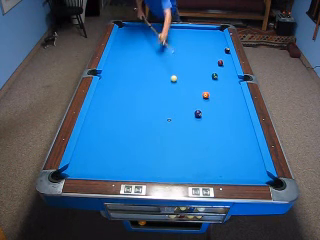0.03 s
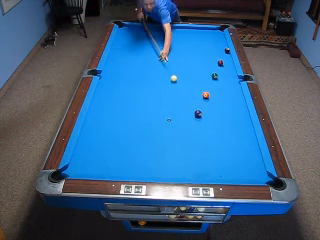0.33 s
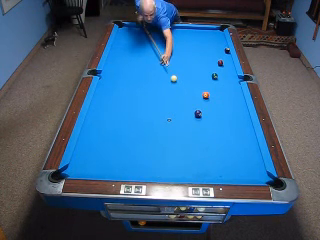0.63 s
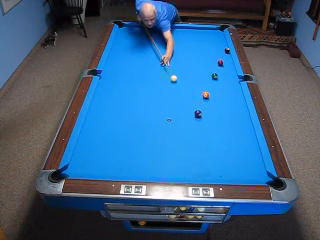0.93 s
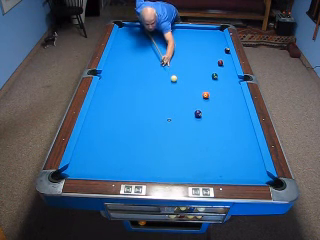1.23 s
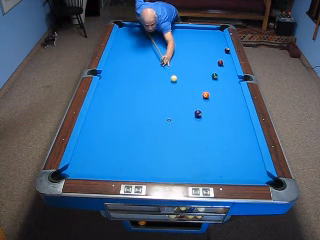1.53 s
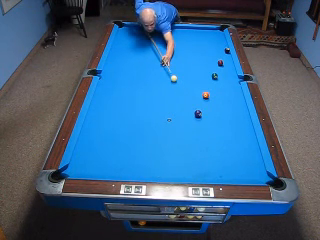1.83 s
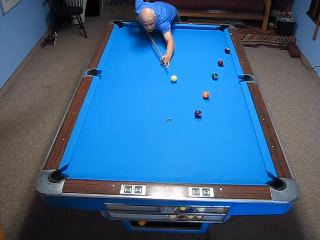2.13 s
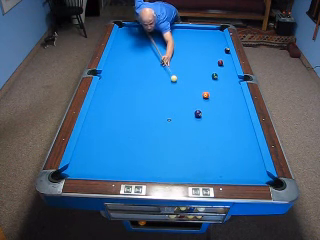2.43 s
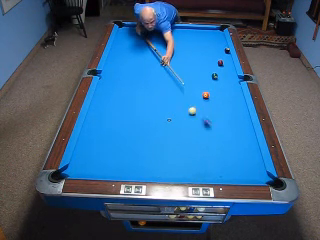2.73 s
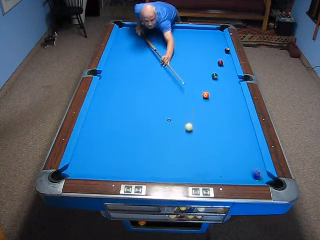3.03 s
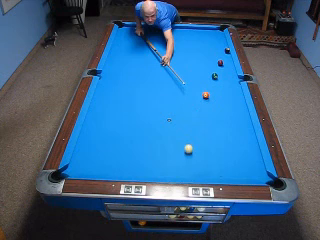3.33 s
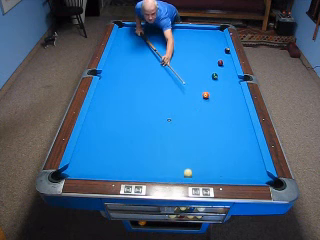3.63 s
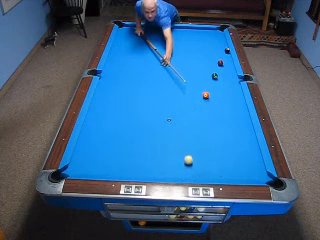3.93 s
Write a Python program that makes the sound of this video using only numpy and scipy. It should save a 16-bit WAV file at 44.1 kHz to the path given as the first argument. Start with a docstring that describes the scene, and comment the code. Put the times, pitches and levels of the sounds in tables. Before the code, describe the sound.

A pool shot sounds in a quiet room with humming ventilation. A hand slides faintly on cloth early on, with two light cue taps around 0.4 seconds. The cue knocks the ball at 2.6 seconds, and two balls clack loudly at 2.8. From 3.3 seconds one rattles into a pocket and rolls hollowly down the return channel, thudding several times from 3.7 to 4 seconds.

```python
"""Two pool balls clack in a quiet room with humming ventilation.
A hand slides on the cloth, the cue taps lightly, then knocks the cue ball into another; that ball
rattles into a corner pocket, rolls down the return channel and thuds at its bend. Each impact is a
short pulse that excites damped modes and reflections in the table and the room.
The clack drives a limiter, whose gain drops and then creeps back."""
import sys
import numpy as np
from scipy import signal
from scipy.fft import rfft, irfft
from scipy.io import wavfile

SR = 44100
rng = np.random.default_rng(int(sys.argv[2]) if len(sys.argv) > 2 else 0)


def master(y):
    """Save y as 16-bit WAV."""
    cut = np.clip(np.atleast_2d(y).T, -1, 1)
    pcm = np.round(cut * 32767)  # scale
    wavfile.write(sys.argv[1], SR, pcm.astype(np.int16))


N = 176400
T = np.arange(SR * 3 // 4) / SR  # time axis of an impulse response, in seconds
CUE_S, CLACK_S = 2.5941, 2.7839

# Spectra. Each row: frequency in Hz, relative level in dB.
AIR_SPECTRUM = [(15, -38.5), (25, -4.5), (48, -2.5), (91, -5.5), (122, -5.5), (175, -11.5), (227, -7.5),
                (322, -9), (400, -17.5), (684, -21), (804, -26.5), (1750, -23.5), (2230, -28.5),
                (7910, -42), (15500, -50)]
CLOTH_SPECTRUM = [(1000, -1), (4000, 2), (7500, -3), (10000, -6), (15000, -13)]
TAP_SPECTRUM = [(100, -7), (500, 9), (1000, -5.5), (2200, -1.5), (4000, -6), (5300, -8), (9500, -12),
                (12000, -26)]
CUE_SPECTRUM = [(20, -66), (70, -19), (170, -1), (520, 2.5), (780, -6.5), (1000, 2.5), (1350, -3),
                (2100, -13), (3000, -15), (5500, -28), (8000, -34.5), (15000, -50)]
CLACK_SPECTRUM = [(100, -39.5), (600, -3), (1200, 5.5), (1800, 6), (2300, 6.5), (2750, 10.5), (3200, -3),
                  (4200, 0), (5200, -32), (8000, -32), (15000, -44.5)]
CLACK_REVERB_SPECTRUM = [(100, -10), (750, -15.5), (1500, 0.5), (2200, -2), (2800, -0.5), (4000, -11),
                         (5200, -35), (8000, -41), (15000, -47)]
ROLL_SPECTRUM = [(20, -35.5), (110, -11), (200, -6), (330, 5), (750, -18.5), (1000, -20), (3000, -48),
                 (15000, -70)]
LINER_SPECTRUM = [(20, -41.5), (150, -6), (350, 0.5), (750, 2), (1000, -9), (1600, -9.5), (2100, -18),
                  (5000, -23.5), (6300, -29.5), (8000, -28), (15000, -48)]
CLINK_SPECTRUM = [(500, -24), (2100, -6.5), (2700, 3.5), (5000, -3), (6200, -20.5), (15000, -35.5)]
THUD_SPECTRUM = [(20, -40), (110, -17.5), (200, 4), (330, 6.5), (450, 2), (750, -5), (1000, -14.5),
                 (1400, -17.5), (2000, -32.5), (3000, -31.5), (7000, -53.5), (15000, -82)]
# Modes of the struck bodies. Each row: frequency in Hz, relative level in dB, 60 dB decay in seconds.
TAP_RESONANCES = [(2110, -30, .09), (2850, -36, .07), (5230, -40, 0.073)]
CUE_RESONANCES = [(182, -15, 0.32), (330, 1, 0.029), (492, -13.5, 0.22), (648.6, -23.5, .4),
                  (977, -22.5, 0.31), (1060, -29, 0.18), (1245, -17, 0.3), (1273, -14, .32),
                  (1498, -17, 0.18), (1653, -28, 0.28), (2060, -20, 0.22), (2440, -33.5, 0.54),
                  (3070, -37.5, .3)]
CLACK_RESONANCES = [(1410, -19, 0.28), (1550, -16, 0.19), (1710, -11, .04), (2750, -7.5, .13),
                    (3020, 1.5, 0.014)]
POCKET_RESONANCES = [(188, -23.5, 0.19), (317.5, -18.5, 0.24), (367.2, -12, .24), (564.3, -20, .22),
                     (706, -17, 0.16), (730, -12.5, 0.079), (828, -26, 0.29), (981, -27, 0.39)]
CHANNEL_RESONANCES = [(185.2, -22.5, 0.68), (243, 1.5, 0.034), (240, -12, 0.19), (292.3, -9, 0.34),
                      (372.3, -21.5, 0.27), (425, -6, 0.038), (449.7, -16, 0.17), (675, -24, 0.22)]
# Echoes of the cue's knock. Each row: delay in seconds, gain relative to the direct path.
CUE_REFLECTIONS = [(.0012, 0.16), (.0053, 0.44), (.0067, 0.55), (.0238, 0.22), (.046, 0.33)]
# Delayed pulses: the second ball's click right after the first, then echoes from lamp, ceiling and walls.
# Each row: delay in seconds, gain relative to the first pulse.
CLACK_ARRIVALS = [(.0006, 0.65), (.0063, 0.69), (.024, 0.45), (.0266, 0.28), (.0381, 0.16)]
# Reverberation of the room. Each row: frequency in Hz, 60 dB decay in seconds.
ROOM_T60 = [(120, 1), (500, 0.5), (1500, 0.4242), (3000, 0.4153), (7000, 0.315), (14000, 0.1347)]
# Stereo width of the reflections. Each row: frequency in Hz, side level relative to mid in dB.
SIDE_SPECTRUM = [(150, -35.5), (350, -17.5), (700, -8.5), (1300, -7), (2100, -1), (10000, -7.5)]
# Likeness of the air noise in left and right. Each row: frequency in Hz, correlation from 0 to 1.
AIR_CORRELATION = [(60, 0.98), (180, 1), (550, 0.9), (1650, 0.53), (4970, 0.42), (15000, 0.13)]
# Tones of the ventilation. Each row: frequency in Hz, relative level in dB.
HUM_TONES = [(119, -43), (156.1, -46), (221, -49), (239, -49), (425.3, -55), (7881, -77)]
# Hand movements. Each row: midpoint in seconds, length in seconds, relative level in dB.
HAND_SLIDES = [(.15, 0.23, -53), (.64, 0.33, -51.5), (2.151, 0.12, -54)]
# Light taps of the cue. Each row: start in seconds, relative level in dB.
CUE_TAPS = [(.3835, -13), (.424, -19.5)]
# Envelope of the rolling. Each row: time in seconds, relative level in dB.
ROLL_ENVELOPE = [(3.14, -63), (3.18, -33.5), (3.33, -39), (3.4, -32), (3.55, -13), (3.598, -19),
                 (3.689, -20.5), (3.76, -14.5), (3.8, -16), (3.89, -19), (3.961, -25.5), (4, -25)]
# Pocket hits. Each row: start in seconds, knock gain in dB, tilt in dB per octave, clink gain in dB.
POCKET_HITS = [(3.2622, -2, 1.5, 1), (3.296, -3, -3, -16), (3.3482, 2, 0, 3.5), (3.375, 1.5, -3, -4),
               (3.387, 1, 1, -0.5), (3.404, 0, -1, -1.5), (3.4307, -7.5, 0.5, -11), (3.45, -10, 0.5, -8.5),
               (3.466, -3, -4.5, -23), (3.514, -3, -5, -22), (3.553, -6.5, -5.5, -19.5),
               (3.565, -6, -6.5, -23.5)]
# Hits at the channel's bend. Each row: start in seconds, gain in dB, treble tilt in dB per octave.
BEND_HITS = [(3.739, -10.5, 1), (3.809, -3, 5), (3.8148, 6, -0.5), (3.8386, 3.5, -1), (3.8551, -2, -6.5),
             (3.8722, -8, -7), (3.921, -9.5, -9), (3.958, -10.5, -9.5)]


def amp(db):
    """Amplitude grows tenfold for every 20 dB."""
    return 10 ** (np.asarray(db) / 20)


def unit_rms(x):
    """Normalisation brings the mean power to one."""
    return x / np.sqrt(np.mean(x ** 2) + 1e-20)


def curve_at(points, hz):
    """Interpolation on a logarithmic frequency axis joins the points."""
    freqs, values = np.transpose(points)
    return np.interp(np.log(hz + 1), np.log(freqs), values)


def add(mix, start_s, sound):
    """Superposition: a sound sums into the mix from its start time."""
    part = mix[..., round(start_s * SR):][..., :sound.shape[-1]]
    part += sound[..., :part.shape[-1]]


def shaped(x, spectrum):
    """Zero-phase filtering weights each frequency by a spectrum in dB."""
    n = x.shape[-1]
    return irfft(rfft(x) * amp(curve_at(spectrum, np.fft.rfftfreq(n, 1 / SR))), n)


def pulse(spectrum, tilt_db=0, size=4096):
    """A minimum-phase pulse delivers its unit energy as early as its spectrum allows."""
    hz = abs(np.fft.fftfreq(size, 1 / SR))
    log_gain = np.log(amp(curve_at(spectrum, hz) + tilt_db * np.log2(1 + hz / 700)))
    transfer = np.exp(np.conj(signal.hilbert(log_gain)))
    impact = np.fft.ifft(transfer).real[:size // 2]
    return impact / np.linalg.norm(impact)


def through(x, response):
    """Convolution carries a mono sound through a stereo impulse response."""
    return signal.fftconvolve(x[None], response, axes=1)[:, :max(len(x), len(T))]


def ring(modes, rise_s, spread_db=0, tilt_db=0):
    """Free vibration is a sum of damped modes; the spread stands for a varying point of impact."""
    centre_hz = np.mean([mode[0] for mode in modes])
    tones = 0
    for hz, db, t60 in modes:
        onset_db = db + tilt_db * np.log2(hz / centre_hz) + spread_db * rng.standard_normal()
        tones += amp(onset_db - 60 * T / t60) * np.sin(2 * np.pi * hz * T)
    return tones * (1 - np.exp(-T / rise_s))


def diffuse(build_s, t60=None):
    """Dense reflections build up and decay exponentially, at the room's rate unless t60 is given."""
    mid, side = rng.choice([-1., 1.], (2, len(T))) * (rng.random((2, len(T))) < 1 / 8)
    side = shaped(side, SIDE_SPECTRUM)
    hz, t, bands = signal.stft(np.array([mid + side, mid - side]), SR, nperseg=256)
    decay_s = curve_at(ROOM_T60, hz)[:, None] if t60 is None else t60
    tail = signal.istft(bands * amp(-60 * t / decay_s), SR)[1][:, :len(T)]
    tail *= 1 - np.exp(-T / build_s)
    return tail / np.linalg.norm(tail[0])


def paths(arrivals):
    """A tapped delay line: weaker, delayed pulses follow the first."""
    response = np.zeros((2, len(T)))
    response[:, 0] = 1
    for delay_s, gain in arrivals:
        response[0, round(delay_s * SR) + rng.integers(0, 3)] += gain
        response[1, round(delay_s * SR)] += gain
    return response


def ventilation(waver=0.6):
    """Broadband air noise underlies a hum that wavers by slow amplitude and phase modulation."""
    common, separate = rfft(rng.standard_normal((2, N)))
    correlation = np.clip(curve_at(AIR_CORRELATION, np.fft.rfftfreq(N, 1 / SR)), 0, 1)
    right = correlation * common + np.sqrt(1 - correlation ** 2) * separate
    air = unit_rms(shaped(irfft(np.array([common, right]), N), AIR_SPECTRUM))
    t, knots = np.arange(N) / SR, np.linspace(0, N / SR, 32)
    hum = 0
    for hz, db in HUM_TONES:
        swell, drift = (np.interp(t, knots, rng.standard_normal(len(knots))) for _ in range(2))
        tone = np.sqrt(2) * np.sin(2 * np.pi * hz * t + 2 * waver * drift)
        hum += amp(db) * (1 + waver * swell) * tone
    return amp(-36.5) * air + hum


def hand_slides():
    """Friction between hand and cloth makes a hiss that swells and fades."""
    out = np.zeros((2, N))
    for midpoint_s, length_s, db in HAND_SLIDES:
        n = round(length_s * SR)
        hiss = unit_rms(shaped(rng.standard_normal((2, N)), CLOTH_SPECTRUM))[:, :n]
        add(out, midpoint_s - length_s / 2, amp(db) * np.hanning(n) * hiss)
    return out


def cue_taps():
    """Light impacts of the cue excite faint, quickly damped high modes."""
    out = np.zeros((2, N))
    for start_s, db in CUE_TAPS:
        space = diffuse(build_s=0.00028, t60=0.022) + diffuse(build_s=0.004)
        tap = through(pulse(TAP_SPECTRUM), space) + ring(TAP_RESONANCES, rise_s=0.0005)
        add(out, start_s, amp(db) * tap)
    return out


def cue_strike():
    """The compliant leather tip gives a dull knock and sets the modes of shaft and ball ringing."""
    out = np.zeros((2, N))
    reverb = amp(12) * through(pulse(CUE_SPECTRUM, tilt_db=2), diffuse(build_s=0.006))
    knock = amp(16) * through(-pulse(CUE_SPECTRUM), paths(CUE_REFLECTIONS))
    add(out, CUE_S, knock + reverb - ring(CUE_RESONANCES, rise_s=0.00224))
    return out


def ball_clack(wall_delay_s=0.024):
    """In a brief, hard contact each ball radiates a click; a bright ring and room echoes follow."""
    out = np.zeros((2, N))
    clack = amp(24) * through(-pulse(CLACK_SPECTRUM), paths(CLACK_ARRIVALS))
    clack -= ring(CLACK_RESONANCES, rise_s=0.00044)
    add(out[0], CLACK_S + 1 / SR, clack[0])  # arrives a little later on the left
    add(out[1], CLACK_S, clack[1])
    reflected = pulse(CLACK_REVERB_SPECTRUM)
    add(out, CLACK_S, amp(18.5) * through(reflected, diffuse(build_s=0.02)))
    wall_flutter = through(reflected, diffuse(build_s=0.0005, t60=0.16))
    add(out, CLACK_S + wall_delay_s, amp(22) * wall_flutter)
    return out


def ball_roll(bumps_per_s=400):
    """Random excitation: small bumps of the rolling ball drive the hollow return channel's modes."""
    bumps = rng.choice([-1., 1.], N) * (rng.random(N) < bumps_per_s / SR)
    rumble = unit_rms(through(shaped(bumps, ROLL_SPECTRUM), diffuse(build_s=0.0012, t60=0.072)))
    hollow = unit_rms(signal.fftconvolve(bumps, ring(CHANNEL_RESONANCES, rise_s=0.0015))[:N])
    envelope_db = np.interp(np.arange(N) / SR, *np.transpose(ROLL_ENVELOPE), left=-120)
    return (rumble + amp(-7) * hollow) * amp(envelope_db)


def pocket_rattle():
    """Rebounds knock the liner and clink on the metal casting; softer contact favours the low modes."""
    out = np.zeros((2, N))
    for start_s, knock_db, tilt_db, clink_db in POCKET_HITS:
        body = amp(16.5) * diffuse(build_s=0.001, t60=0.046)
        room = amp(17.5) * diffuse(build_s=0.0074)
        knock = through(pulse(LINER_SPECTRUM, tilt_db), body + room)
        hollow = ring(POCKET_RESONANCES, rise_s=0.0032, spread_db=2.1, tilt_db=0.91 * tilt_db)
        add(out, start_s, amp(knock_db) * (knock + amp(5.5) * hollow))
        casting = amp(8.5) * diffuse(build_s=0.000079, t60=0.018)
        clink_room = amp(2) * diffuse(build_s=0.0028)
        add(out, start_s, amp(clink_db) * through(pulse(CLINK_SPECTRUM), casting + clink_room))
    return out


def bend_thuds():
    """Impacts of the ball at the bend excite the channel's low resonances."""
    out = np.zeros((2, N))
    for start_s, db, tilt_db in BEND_HITS:
        direct = amp(14) * paths([])
        body = amp(19) * diffuse(build_s=0.00084, t60=0.039)
        room = amp(15) * diffuse(build_s=0.0033)
        thud = through(pulse(THUD_SPECTRUM, tilt_db), direct + body + room)
        hollow = amp(1.5) * ring(CHANNEL_RESONANCES, rise_s=0.0019)
        add(out, start_s, amp(db) * (thud + hollow))
    return out


def scene():
    """The sources superpose; a small level difference places them slightly to the right."""
    mix = ventilation() + hand_slides() + cue_taps() + cue_strike() + ball_clack()
    mix += ball_roll() + pocket_rattle() + bend_thuds()
    return mix * amp([[-0.35], [0.35]])


def record(dry):
    """A limiter ducks quickly and recovers slowly; overshoot saturates; a low-pass limits the band."""
    limit_db, attack_s, recover_db_per_s = 1.5, 0.002, 8
    knee, cutoff_hz = 5, 15900
    over_db = np.maximum(20 * np.log10(abs(dry).max(0) + 1e-9) - limit_db, 0)
    recovery_db = np.arange(N) / SR * recover_db_per_s
    held_db = np.maximum.accumulate(over_db + recovery_db) - recovery_db
    pole = np.exp(-1 / (attack_s * SR))
    ducked = dry * amp(-signal.lfilter([1 - pole], [1, -pole], held_db))
    clipped = ducked / (1 + abs(ducked) ** knee) ** (1 / knee)
    lowpass = signal.firwin(255, cutoff_hz, window=("kaiser", 9), fs=SR)
    return signal.oaconvolve(clipped, lowpass[None], "same")


dry = scene()
out = record(dry)
master(out)
```